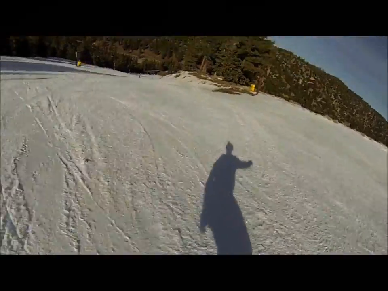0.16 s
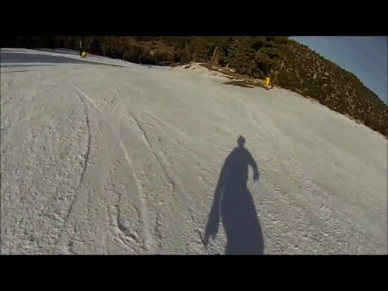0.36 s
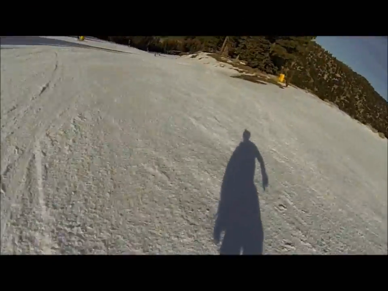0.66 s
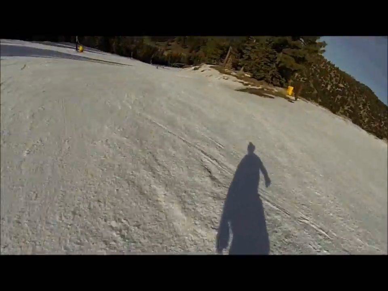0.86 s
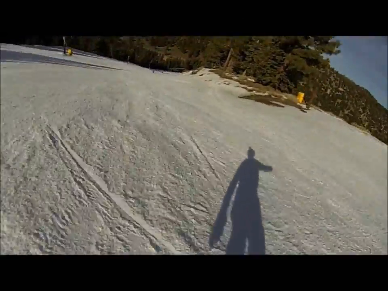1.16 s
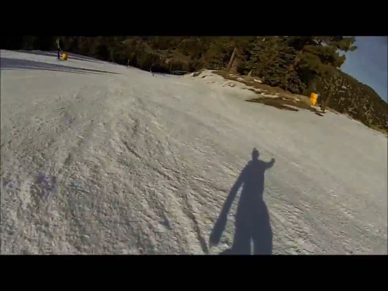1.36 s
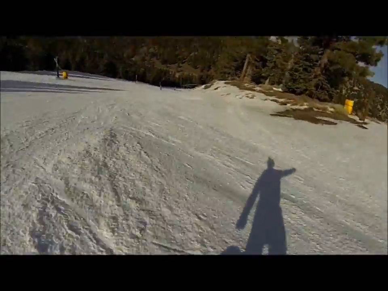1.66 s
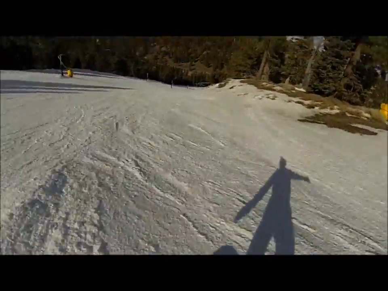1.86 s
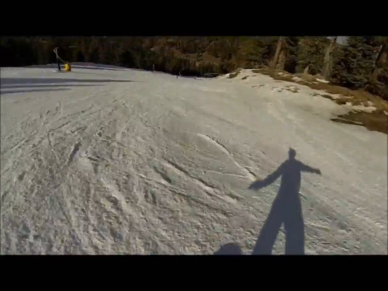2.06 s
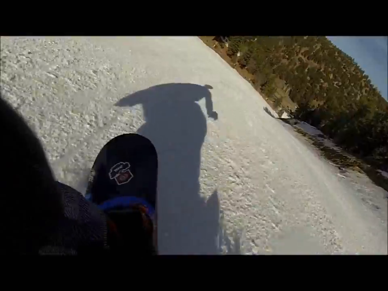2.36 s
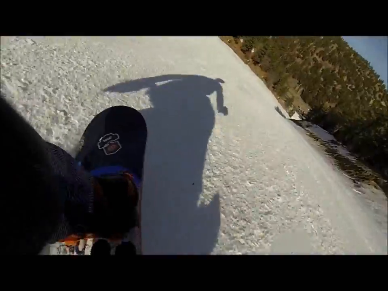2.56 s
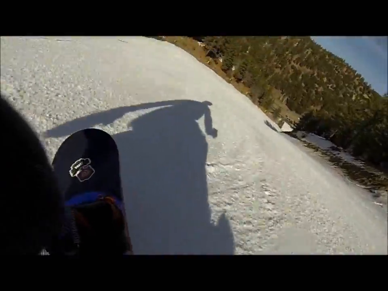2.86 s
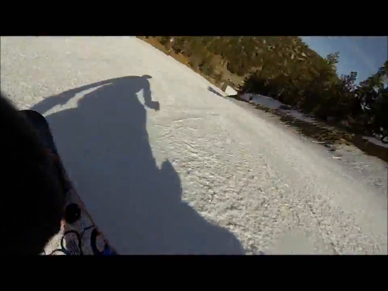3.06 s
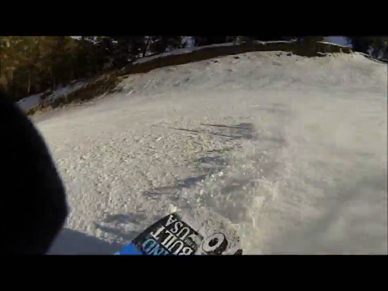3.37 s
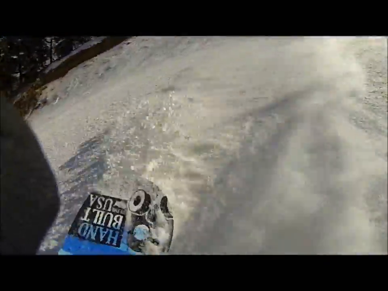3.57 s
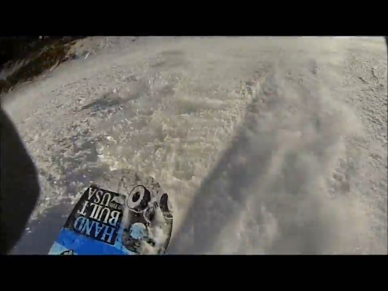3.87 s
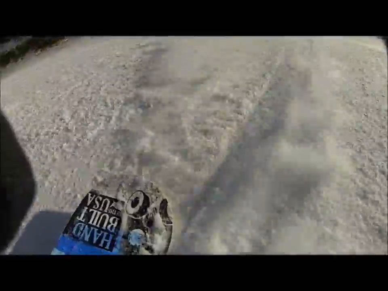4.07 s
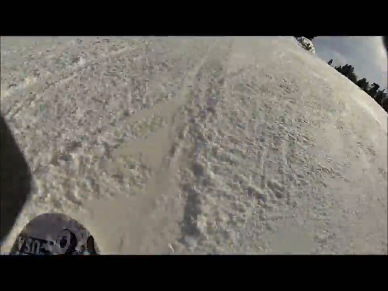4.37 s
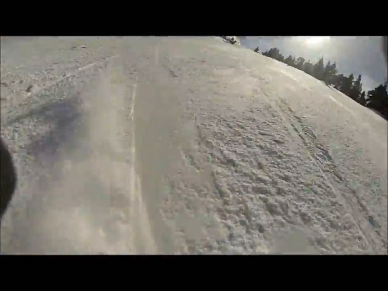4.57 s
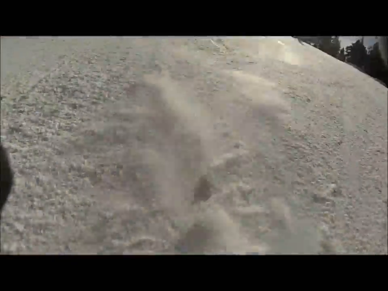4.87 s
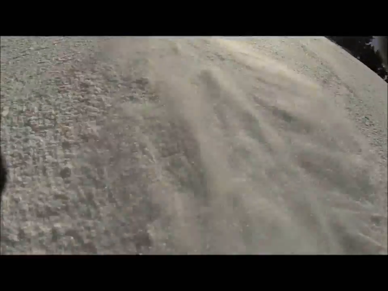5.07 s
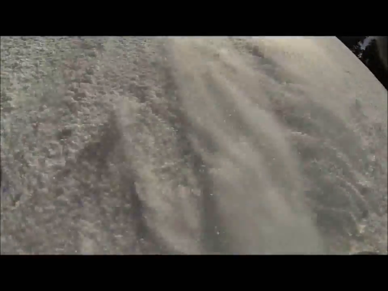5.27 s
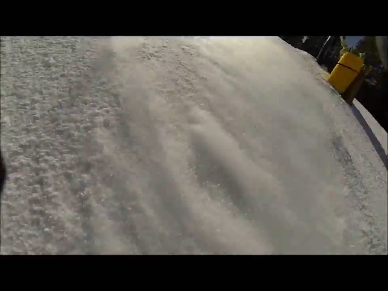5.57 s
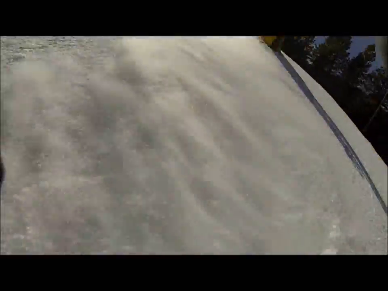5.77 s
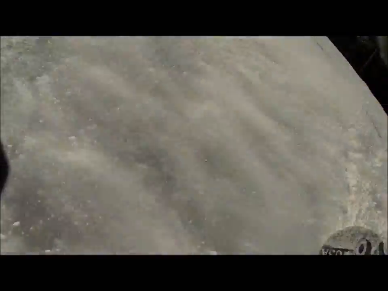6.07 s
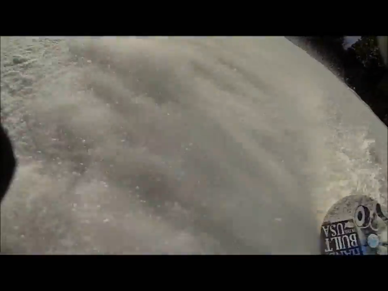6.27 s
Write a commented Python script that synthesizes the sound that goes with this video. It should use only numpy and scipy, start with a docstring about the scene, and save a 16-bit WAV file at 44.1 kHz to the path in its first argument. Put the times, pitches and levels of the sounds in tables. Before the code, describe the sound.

Deep wind buffeting and soft board rub with dull knocks and dry clicks, cut abruptly to a harsh, hissing snowboard skid that fades and surges again.

```python
"""A snowboard on packed snow, heard from an action camera in a plastic case, in two passages parted by a short silence.
First the flat base glides: a scrape of breaking snow grains with a rasp and a board drone, all following the weight on it.
Ridges thump and shift the load on the board, squared turbulence flutters over the wind's rumble and the mount creaks in clicks.
Then the edge skids through turns: dense grains of crust ring the case, the board drones and powder hisses,
over a changing wind, with more thumps from the ridges."""
import sys
import numpy as np
from scipy import signal
from scipy.fft import rfft, irfft, next_fast_len
from scipy.io import wavfile
from scipy.ndimage import uniform_filter1d

SR = 44100
rng = np.random.default_rng(int(sys.argv[2]) if len(sys.argv) > 2 else 0)


def wrap_up_sound(samples):
    """Save the sound to the file named by the first command line argument, as 16-bit audio."""
    columns = np.atleast_2d(samples).T
    # keep every value between -1 and 1, then stretch to whole-number steps
    tamed = np.clip(columns, -1, 1)
    steps = np.round(tamed * 32767).astype(np.int16)
    wavfile.write(sys.argv[1], SR, steps)


N = 283563
T = np.arange(N) / SR  # time of every sample, s

# Gliding and skidding passages: start_s, end_s
PASSAGES = [(0, 2.286), (2.334, 6.44)]

# Two turns with the edge released in between, before trims: time_s, scrape_level_db, rasp_level_db, drone_level_db
TURNS = [(2.35, -14.5, -27.5, -41.5), (2.85, -17, -29.5, -43.5), (3.06, -15.5, -26.5, -45.5),
         (3.44, -20, -32.5, -40), (3.6, -30, -42.5, -41), (4.0, -26.5, -40.5, -45),
         (4.15, -32, -45.5, -44.5), (4.34, -39.5, -47, -59.5), (4.6, -30.5, -42, -48.5),
         (4.74, -32, -42.5, -40.5), (5.0, -29.5, -41.5, -42), (5.12, -32, -44, -43), (5.46, -29, -43, -41),
         (5.6, -22.5, -36, -37.5), (5.82, -16, -31, -32.5), (5.95, -21.5, -36.5, -36),
         (6.15, -20.5, -33, -33), (6.43, -23, -36, -41)]
# The edge digs in (+) or lets go (-) for a moment: centre_s, half_length_s, gain_db
SURGES = [(3.255, 0.023, 2), (4.46, 0.031, 4), (4.545, 0.041, -9.5), (4.735, 0.027, 11.5),
          (4.781, .017, 16.5), (4.815, 0.009, -5), (4.858, 0.037, 10), (5.295, 0.058, 7.5),
          (6.31, 0.022, 3)]
# Brief crunches as the base or edge meets hard lumps; relative push on the grains: centre_s, half_length_s, gain_db
CRUNCHES = [(.194, 0.0025, 5), (.549, .003, 5.5), (.755, 0.0025, 5), (.836, 0.0034, 8), (.919, 0.0037, 12),
            (1.859, 0.0046, 9), (2.364, 0.0021, -1.5), (2.667, .002, 7), (2.749, 0.002, 10),
            (2.78, 0.003, 9.5), (2.851, 0.0021, 13), (2.903, 0.0018, 9.5), (3.002, 0.0022, 7),
            (3.096, 0.0022, 9.5), (4.331, 0.0024, 8), (4.65, 0.0034, 13.5), (4.682, .002, 11.5),
            (4.826, 0.0025, 8), (6.264, 0.0022, 6.5)]
# Swells of the powder hiss: centre_s, half_length_s, gain_db
POWDER_SWELLS = [(2.48, 0.44, 14.5), (3.03, .11, 13), (4.45, 0.18, 3), (4.78, 0.069, 5), (5.25, 0.33, 3.5),
                 (5.85, .3, 5), (6.3, 0.21, 2)]
# Part of the edge's hiss that reaches the microphone straight, not through the case: time_s, share_0_to_1
DIRECT = [(2.33, 0.76), (3.1, 0.26), (3.6, 0.09), (6.43, 0.2)]
# Weight on the flat base, as scrape level before trim: time_s, level_db
GLIDE_WEIGHT = [(0.02, -35.5), (0.8, -38), (1.05, -42.5), (1.35, -43), (1.66, -47.5), (1.92, -46),
                (1.985, -31), (2.07, -46), (2.28, -38)]
# Ridges under the board: load on the ridge (+ heavier), then drop of load behind it (- heavier), and time it lasts:
# start_s, thump_db, ridge_load_db, drop_db, shift_s
JOLTS = [(0.51, -12.5, -1.5, 3, .02), (0.879, -9.5, 2, 4, .04), (0.963, -9, 2.5, 3.5, .05),
         (1.07, -8, -1.5, 15.5, .11), (1.291, -11.5, 5, 2.5, .03), (1.374, -11, 4.5, 2, .04),
         (1.479, -10, 5, 2, .02), (1.548, -7.5, 5, 12.5, .055), (1.633, -23, 4.5, 1, 0.022),
         (1.713, -7, 3, 9, .09), (1.903, -18, 6.5, 4, .02), (2.028, -18, 3.5, -3, .02),
         (2.094, -5, 6, 1, .04), (3.999, -24.5, 3, 3, .02), (4.741, -27, -1, 3.5, .02),
         (4.889, -21, -1.5, -7, 0.018), (5.024, -20, 3.5, 3, .04), (5.177, -17.5, -2, -5, .02),
         (5.391, -13, -0.5, 6.5, .03)]
# Creaks of the shaken mount, before trim: start_s, length_s, level_db
CREAKS = [(0.335, 0.0047, -48.5), (.857, .002, -50), (0.88, .009, -51), (0.969, 0.0059, -50),
          (1.053, 0.0022, -52), (1.061, 0.0083, -50.5), (1.21, 0.0028, -52.5), (1.348, .002, -47),
          (1.367, .007, -49.5), (1.377, 0.0045, -50), (1.484, 0.005, -51), (1.549, 0.0068, -50.5),
          (1.72, 0.0062, -53.5), (2.054, 0.0019, -44.5), (2.1, 0.0033, -52)]
# Steady air on the case, before trim: time_s, level_db
AIR = [(0, -20), (2.29, -21.5), (2.33, -40), (2.85, -49.5), (3.3, -38.5), (3.75, -32.5), (4.22, -41.5),
       (4.6, -40.5), (4.82, -31), (5.2, -35), (5.8, -40.5), (6.43, -38)]
# Gusts (+) and lulls (-): centre_s, half_length_s, gain_db
GUSTS = [(.06, 0.1, 4), (.27, 0.039, 5.5), (.43, 0.054, -3.5), (.55, 0.019, 5), (.65, 0.046, -1),
         (.87, 0.035, 5.5), (1.04, 0.074, 4.5), (1.165, 0.019, -22), (1.44, 0.017, 4), (1.64, 0.046, -4),
         (2.05, 0.037, 7), (3.02, 0.045, 12.5), (3.63, 0.022, 4), (3.95, 0.03, 12), (4.42, 0.044, 8.5),
         (5.02, 0.013, 8), (5.6, .06, 5), (6.31, 0.051, 5)]

# Relative colours of the edge's scrape, its fine rasp and the powder hiss: frequency_hz, level_db
SKID_COLOUR = [(300, -22.5), (800, -28.5), (1000, -22), (1180, -12), (1340, -1.5), (1550, 2), (1750, -1),
               (1980, -6.5), (2200, -15.5), (3000, -45.5), (6000, -78)]
SKID_RASP = [(1500, -11), (2300, -3), (3600, -0.5), (4700, -5), (6500, -12), (8000, -17), (9000, -25.5),
             (15000, -42)]
POWDER_COLOUR = [(3000, 4.5), (5500, -5), (7800, 14), (9000, 9), (10000, 0), (11400, 6), (12200, -3.5),
                 (14000, 0), (15400, -16)]
# Relative colours of the flat base's scrape and rasp: frequency_hz, level_db
GLIDE_COLOUR = [(400, -19), (850, -21), (1050, -15), (1350, 2.5), (1600, -5), (2000, -15.5), (3000, -42),
                (6000, -45)]
GLIDE_RASP = [(1200, -14.5), (2100, 1.5), (3200, 2.5), (4300, -7.5), (6000, -13.5), (7400, -20),
              (9000, -26.5), (11500, -30), (15000, -39)]
# Relative colours of the board drone and the mount's clicks: frequency_hz, level_db
DRONE_COLOUR = [(60, -16), (130, -2.5), (200, -1.5), (290, 4), (420, -4), (600, -12.5), (850, -15.5),
                (1400, -33)]
TICK_COLOUR = [(800, -26), (1500, -16), (3500, 10.5), (5500, 0.5), (7000, 3), (9000, -9), (13000, -13),
               (16000, -37)]
# Relative colours of the wind's rumble while gliding and while skidding: frequency_hz, level_db
WIND_COLOUR = [(8, 3.5), (20, 7.5), (35, 7), (52, 1.5), (68, -12.5), (90, -18), (130, -39.5), (220, -47),
               (500, -60), (1500, -59)]
LEE_COLOUR = [(8, 8.5), (20, 1), (35, 3), (55, -9.5), (80, -10.5), (120, -23), (220, -39), (500, -82),
              (1500, -109)]
# Peaks (+) and notches (-) of the case in each passage: centre_hz, half_width_hz, lift_db
SKID_MODES = [(2169, 44, -15.5), (2578, 172, 13), (3277, 250, 8), (3656, 130, -10), (3890, 160, 6),
              (5370, 130, -4), (5900, 160, 2.5), (6980, 190, -5.5), (7700, 550, -3.5), (8950, 590, -11),
              (9970, 320, 5), (10950, 500, 0), (12400, 400, 1)]
GLIDE_MODES = [(2380, 200, 4.5), (3280, 320, 0), (5480, 110, -4), (5680, 100, 6), (7360, 250, 4)]

RIDGE_S = 0.02  # half time on a ridge
SHIFT_DELAY_S, SHIFT_RISE_S = 0.0094, 0.0031  # wait before the load shifts behind a ridge; time the shift takes
FULL_EDGE_DB = -20  # force above which the powder grows no louder
TOP_HZ = 15400  # upper end of the camera's sound


def skid(load, crunch, powder_db=-56.0, drone_db=0.5, rasp_law=0.9, powder_law=0.46, drone_law=0.32):
    """The edge breaks crust and powder hisses; each law is the dB a layer gains per dB of surge or force."""
    surge = swells(SURGES) + load
    force = curve(TURNS) + surge
    pressure = contact(judder_db=0.84, judder_hz=70.4)

    scrape = ring(crust(5500, 2.2, 0.73) * pressure * crunch, SKID_COLOUR, SKID_MODES)
    scrape_gain = undb(force)

    # Finer crystals and the board feel less of each crunch
    rasp = through_case(crust(9000, 1.7, 0.2) * pressure * crunch ** 0.29, SKID_RASP)
    rasp_gain = undb(curve(TURNS, axis=2) + rasp_law * surge)

    # Beyond a fully loaded edge, more force makes the powder no louder
    effort = np.minimum(force - FULL_EDGE_DB, 0)
    powder = through_case(crust(9000, 4.6, 0.9), POWDER_COLOUR)
    powder_gain = undb(powder_db + powder_law * effort + swells(POWDER_SWELLS))

    drone = ring(crust(2000, 1, 0.76) * pressure * crunch ** 0.21, DRONE_COLOUR)
    drone_gain = undb(drone_db + curve(TURNS, axis=3) + drone_law * surge)
    return scrape_gain * scrape + rasp_gain * rasp + powder_gain * powder + drone_gain * drone


def glide(load, crunch, scrape_db=0.5, rasp_db=-11, drone_db=-2,
          rasp_law=0.84, drone_law=0.87, drone_load=0.9, usual_db=-40):
    """The flat base rubs over groomed snow; scrape, rasp and drone all follow the weight on it."""
    force = curve(GLIDE_WEIGHT) - usual_db  # weight above or below the usual, dB
    pressure = contact(judder_db=1.07, judder_hz=60)

    scrape = ring(crust(3000, 2.7, 0.73) * pressure * crunch, GLIDE_COLOUR, GLIDE_MODES)
    scrape_gain = undb(scrape_db + force + load)

    rasp = ring(crust(5000, 2.9, 0.98) * pressure, GLIDE_RASP, GLIDE_MODES)
    rasp_gain = undb(rasp_db + rasp_law * force + load)

    # The board has a broad resonance at 183 Hz
    drone = ring(rng.standard_normal(N) * pressure, DRONE_COLOUR, [(183, 77, 9.9)])
    drone_gain = undb(drone_db + drone_law * force + drone_load * load)
    return undb(usual_db) * (scrape_gain * scrape + rasp_gain * rasp + drone_gain * drone)


def crust(snaps_per_s, scatter_db, powder):
    """Snow crystals breaking: many tiny snaps and a few big ones over the smooth rub of powder."""
    sizes = undb(scatter_db * np.minimum(rng.exponential(size=N), 4))
    breaking = rng.random(N) < snaps_per_s / SR
    snaps = breaking * sizes * rng.choice([-1, 1], N)
    return snaps / snaps.std() + powder * rng.standard_normal(N)


def contact(judder_db, judder_hz):
    """Pressure of the board on the snow, fluttering at random over small bumps."""
    return undb(judder_db * walk(judder_hz))


def ridge_load():
    """The load in dB shifts on each ridge (mostly heavier), shifts behind it (mostly lighter) and settles."""
    load = swells([(s, RIDGE_S, on_ridge) for s, _, on_ridge, _, _ in JOLTS])
    for s, _, _, drop, shift_s in JOLTS:
        age = np.clip(T - s - SHIFT_DELAY_S, 0, 4 * shift_s)
        shifting = 1 - np.exp(-age / SHIFT_RISE_S)
        settling = np.exp(-(age / shift_s) ** 2)
        load = load - drop * shifting * settling
    return load


def through_case(x, spectrum):
    """Part of the hiss comes straight through the air; the rest takes on the resonances of the case."""
    share = np.clip(curve(DIRECT), 0, 1)
    return share * ring(x, spectrum) + (1 - share) * ring(x, spectrum, SKID_MODES)


def jolts(rise_s=0.0048, decay_s=0.012, swing_hz=24):
    """Each ridge kicks the camera: a low, heavily damped thump that swings back."""
    t = np.arange(SR // 8) / SR
    thump = (1 - np.exp(-(t / rise_s) ** 2)) * np.exp(-t / decay_s) * np.cos(2 * np.pi * swing_hz * t)
    kicks = np.zeros(N)
    for s, db, *_ in JOLTS:
        kicks[int(s * SR)] += undb(db)
    return signal.fftconvolve(kicks, thump / thump.max())[:N]


def creaks(level_db=1.0, rattle_db=-73):
    """The shaken mount creaks in short clusters of dry clicks, over a faint steady rattle."""
    force = sum(undb(db) * ((T >= s) & (T < s + length)) for s, length, db in CREAKS)
    rattle = ring(crust(160, 2.4, 0), TICK_COLOUR)
    clicks = ring(crust(3800, 2.3, 0.38), TICK_COLOUR)
    return undb(level_db) * force * clicks + undb(rattle_db) * rattle


def wind(spectrum, level_db, hold_s, flutter_db):
    """Turbulence presses on the case; each big eddy sheds a flutter of small ones."""
    rumble = ring(rng.standard_normal(N), spectrum)
    # Even out the rumble's power over hold_s
    rumble = rumble / np.sqrt(uniform_filter1d(rumble ** 2, int(hold_s * SR)) + 1e-9)
    small_eddies = ring(rng.standard_normal(N), [(70, 10.5), (140, -8.5), (260, -34.0), (500, -20.5)])
    flutter = rumble ** 2 * small_eddies
    return undb(level_db) * (rumble + undb(flutter_db) * flutter)


def ring(x, spectrum, modes=()):
    """Colour x with a spectrum and its resonances, falling away beyond both ends; the result has rms 1."""
    size = next_fast_len(N + SR // 2, real=True)
    f = np.maximum(np.arange(size // 2 + 1) * SR / size, 1)
    hz, db = np.transpose(spectrum)
    shape_db = np.interp(np.log(f), np.log(hz), db)
    for centre, width, lift in modes:
        shape_db = shape_db + lift * np.exp(-np.minimum(((f - centre) / width) ** 2, 20))
    skirts = np.minimum(f / hz[0], 1) * np.minimum(hz[-1] / f, 1) ** 2
    y = irfft(rfft(x, size) * undb(shape_db) * skirts, size)[:N]
    return y / y.std()


def walk(rate):
    """Smooth random motion of spread 1 with about rate turns a second."""
    size = next_fast_len(N, real=True)
    hz = np.arange(size // 2 + 1) * SR / size
    y = irfft(rfft(rng.standard_normal(size)) * np.exp(-(hz / rate) ** 2), size)[:N]
    return y / y.std()


def curve(table, axis=1):
    """One column of a table, joined by straight lines for every sample."""
    columns = np.transpose(table)
    return np.interp(T, columns[0], columns[axis])


def swells(table):
    """Smooth rises and falls in dB, one bell for each row of centre_s, half_length_s, gain_db."""
    return sum(db * np.exp(-np.minimum(((T - s) / length) ** 2, 20)) for s, length, db in table)


def undb(db):
    """Decibels to amplitude gain."""
    return 10 ** (np.asarray(db) / 20)


def scene():
    """The glide, then the skid, each under its own wind, with jolts in both."""
    # Gates with edges softened over 32 samples
    first, second = (uniform_filter1d(1. * ((T >= a) & (T < b)), size=32) for a, b in PASSAGES)
    load = ridge_load()
    crunch = undb(swells(CRUNCHES))
    air = undb(curve(AIR) + swells(GUSTS))

    glide_wind = air * wind(WIND_COLOUR, level_db=2.5, hold_s=0.11, flutter_db=-23)
    gliding = glide(load, crunch) + glide_wind + creaks()

    skid_wind = air * wind(LEE_COLOUR, level_db=7.5, hold_s=0.15, flutter_db=-19)
    skidding = skid(load, crunch) + skid_wind
    return (first * gliding + second * skidding + (first + second) * jolts())[None]


def record(dry):
    """The camera rounds off the very largest peaks and cuts the top."""
    rounded = dry / (1 + (dry / .85) ** 6) ** (1 / 6)
    top_cut = signal.ellip(10, .2, 70, TOP_HZ, fs=SR, output="sos")
    return signal.sosfilt(top_cut, rounded)


dry = scene()
out = record(dry)
wrap_up_sound(out)
```